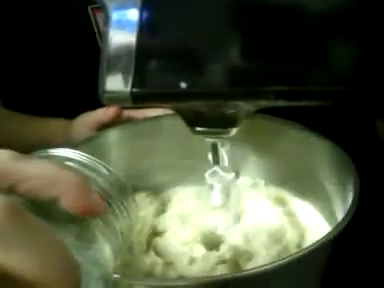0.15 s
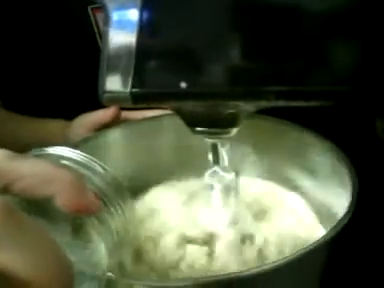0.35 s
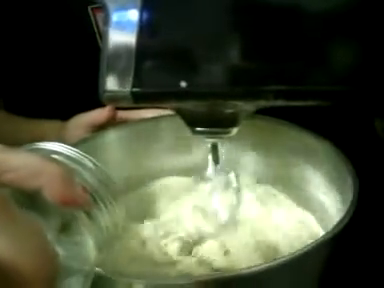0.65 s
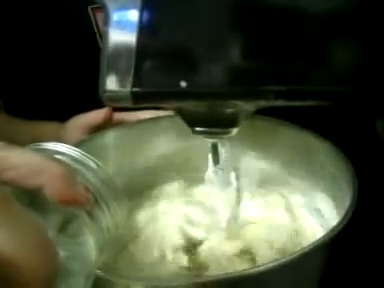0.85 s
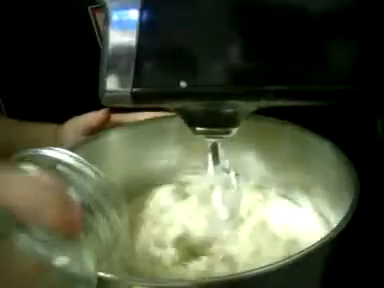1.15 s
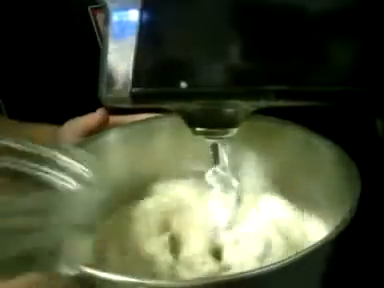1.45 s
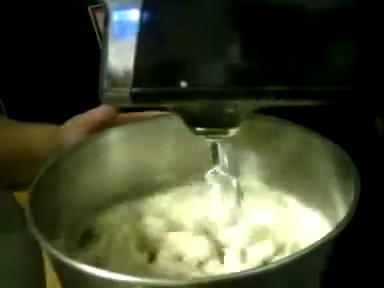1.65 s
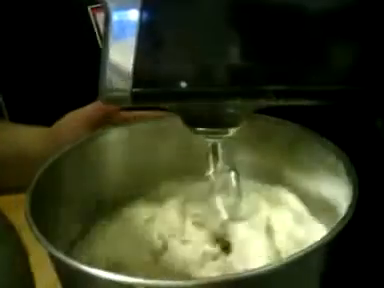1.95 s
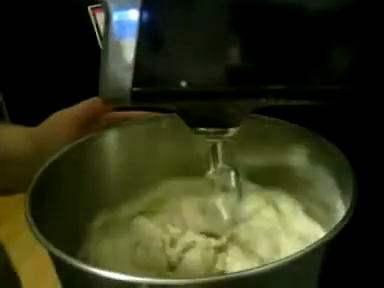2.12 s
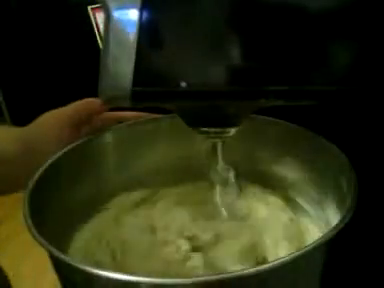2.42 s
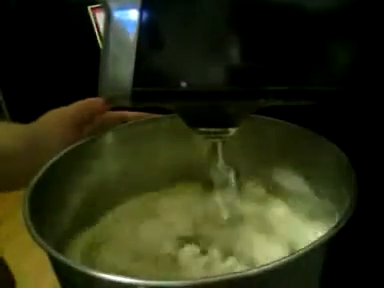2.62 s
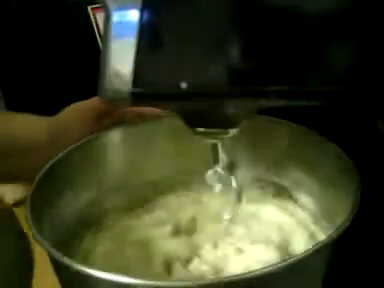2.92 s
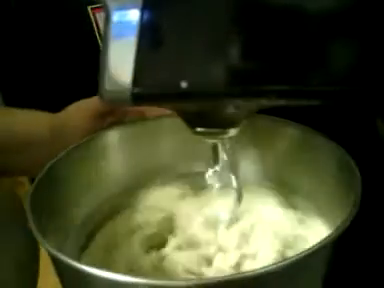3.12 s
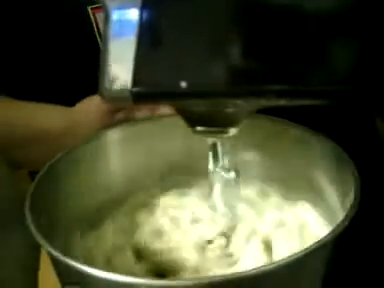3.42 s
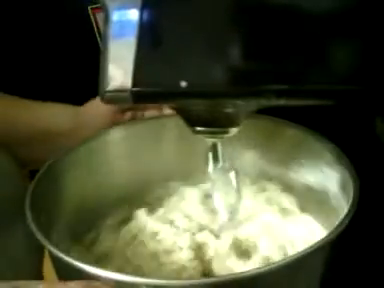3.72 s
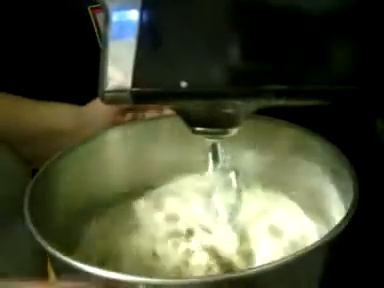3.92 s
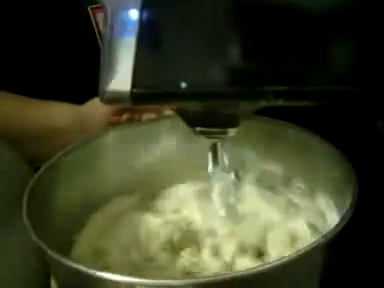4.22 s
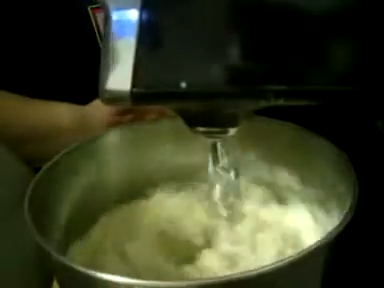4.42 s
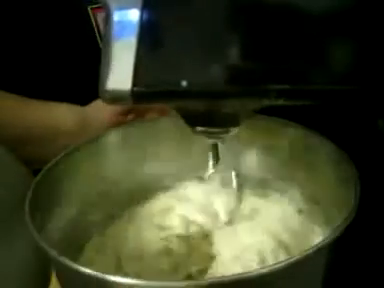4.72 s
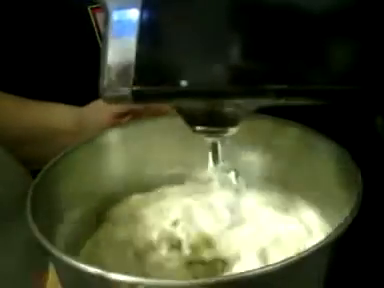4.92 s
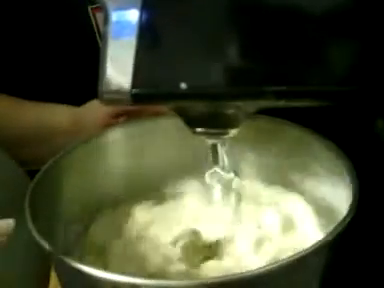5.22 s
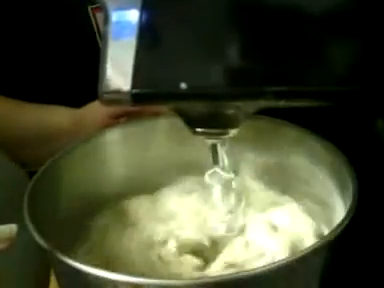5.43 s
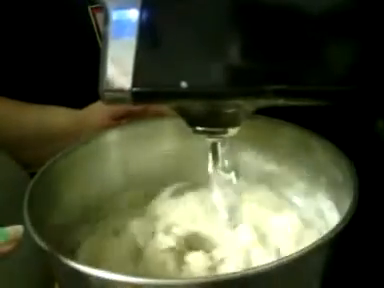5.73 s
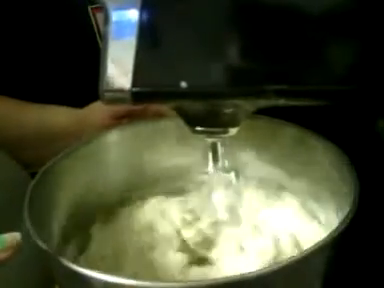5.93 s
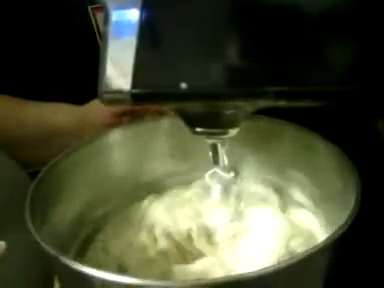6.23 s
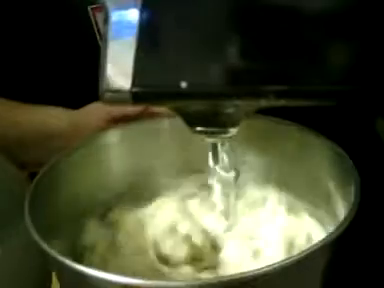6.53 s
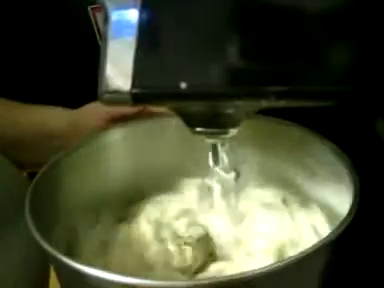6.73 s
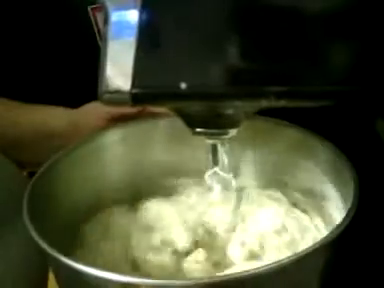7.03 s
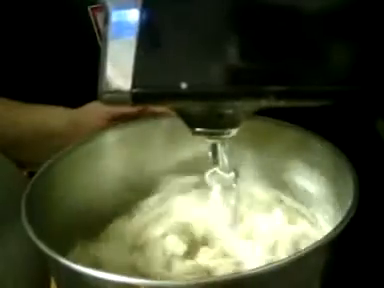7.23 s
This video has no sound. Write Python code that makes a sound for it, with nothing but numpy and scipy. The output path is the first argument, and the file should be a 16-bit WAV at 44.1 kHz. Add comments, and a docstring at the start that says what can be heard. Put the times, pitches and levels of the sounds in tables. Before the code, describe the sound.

A loud, gritty electric mixer runs throughout, buzzing with mains hum and a wavering high whine, slowing and recovering under the dough. Glass taps and shivers against the metal bowl at the start, thickest just before it lifts away. A short double clatter of woody thumps follows, then only motor, grinding and gear knocks remain. Close, cheap microphone with dull top end and crunchy clipped peaks.

```python
"""In a kitchen, a stand mixer kneads dough in a steel bowl. Sines follow the motor's angle and the mains, sagging
each time the hook digs in; shaped noise makes the gears grind, and damped modes make them knock.
A glass jar taps and shivers on the bowl's rim, as decaying rings and a wavering sine, then is set down on the
counter with woody thumps and clacks. A narrow-band microphone close by is driven into clipping."""
import sys
import numpy as np
from scipy import signal
from scipy.fft import rfft, irfft, next_fast_len
from scipy.io import wavfile
from scipy.ndimage import uniform_filter1d, minimum_filter1d, map_coordinates

SR = 44100
rng = np.random.default_rng(int(sys.argv[2]) if len(sys.argv) > 2 else 0)


def materialize(psi):
    """Save the field psi as 16-bit PCM at rate SR to the path in sys.argv[1].

    A 1-D psi becomes a single channel; in a 2-D psi each row is a channel.
    """
    bounded = np.clip(np.atleast_2d(psi).T, -1, 1)
    quanta = np.round(bounded * 32767).astype(np.int16)
    wavfile.write(sys.argv[1], SR, quanta)


N = 324576

# Motor speed, sagging under the dough. Each row: time in seconds, shaft turns in Hz.
SHAFT = [(0.0, 173.1), (0.2, 169.6), (0.35, 169.2), (0.56, 163.5), (0.88, 172.3), (1.2, 173.9),
         (1.45, 174.1), (1.87, 166.2), (2.08, 160.2), (2.33, 169.6), (2.72, 175.5), (3.19, 165.3),
         (3.65, 151.5), (3.96, 162.7), (4.4, 174.5), (4.84, 162.4), (5.08, 152.8), (5.28, 152.4),
         (5.45, 161.3), (5.86, 171.2), (6.07, 165.6), (6.29, 165), (6.52, 156.8), (6.73, 154.7),
         (7.1, 168.9), (7.36, 175.5)]
# Colours of the low, middle and high gear noise. Each row: frequency in Hz, relative density in dB per Hz.
RUMBLE = [(15, -61), (25, -46.5), (49, -20.5), (136, -15.5), (167, -15.5), (208, -14), (227, -15.5),
          (312, -0.5), (382, -11.5), (399, -8), (429, -7), (503, -2), (557, -11), (634, -5.5), (800, -16),
          (1040, -47.5), (1760, -120)]
GRIND = [(700, -62.5), (800, -8.5), (1100, -7.5), (1200, -9.5), (1450, -6), (1520, 4.5), (1630, -3.5),
         (1740, -3.5), (2100, -6), (2500, -6), (2900, -12.5), (3200, -61.5)]
HISS = [(1650, -30.5), (2800, -0.5), (3360, 1), (3870, -16), (4180, -19), (4560, -19.5), (5930, -52.5),
        (10000, -120)]

MAINS_PULSE_HZ = 120
GEAR_RATIO = 16.5  # motor turns per hook turn
MEAN_HZ = 165  # usual motor speed


def amp(db):
    """Decibels to linear gain."""
    return 10 ** (np.asarray(db) / 20)


def unit(x):
    """Scale to an rms of 1."""
    return x / np.sqrt(np.mean(x ** 2) + 1e-20)


def curves(rows):
    """One value per sample for each column after the time."""
    s, *cols = np.transpose(rows)
    return [np.interp(np.arange(N) / SR, s, c) for c in cols]


def wobble(rate):
    """A smooth random curve with rate knots a second, 60 at most."""
    step = np.arange(0, N + 32, 32)
    knots = rng.standard_normal(int(N / SR * 60) + 4)
    return np.interp(np.arange(N), step, map_coordinates(knots, [step * min(rate, 60) / SR]))


def filtered(x, response):
    """Multiply the spectrum of x by a response of frequency."""
    m = next_fast_len(N + SR // 2)
    return irfft(rfft(x, m) * response(np.fft.rfftfreq(m, 1 / SR)), m)[:N]


def noise(spectrum, patchy_db=0):
    """Noise of rms 1 with (Hz, dB) points on a log axis and short random patches of gain."""
    z = signal.stft(rng.standard_normal(N + 512), nperseg=512)[2]
    field = uniform_filter1d(rng.standard_normal(z.shape), 4, axis=0)
    field = uniform_filter1d(field, 4, axis=1)
    white = signal.istft(z * amp(patchy_db * unit(field)), nperseg=512)[1][:N]
    f, db = np.transpose(spectrum)
    return unit(filtered(white, lambda hz: amp(np.interp(np.log(hz + 1), np.log(f + 1), db))))


def add(track, s, sound):
    """Lay a sound on the track at time s."""
    piece = track[round(s * SR):][:len(sound)]
    piece += sound[:len(piece)]


def ring(hz, t60, attack, t):
    """A damped sine with a soft start."""
    decay = np.exp(-np.log(1000) * t / t60)
    return decay * (1 - np.exp(-t / attack)) * np.sin(2 * np.pi * hz * t)


def hook_angle():
    """The dough hook turns with the motor through the gears."""
    return 2 * np.pi * np.cumsum(curves(SHAFT)[0]) / SR / GEAR_RATIO


def mains_angle():
    """Phase of the mains pulse, twice per mains cycle."""
    return 2 * np.pi * MAINS_PULSE_HZ * np.arange(N) / SR


def housing(x):
    """The shell passes everything and lifts its resonances."""
    # Each row: centre in Hz, width in Hz, lift in dB.
    shell = [(2312, 59, 8.5), (506.7, 13, 12), (1679, 13, 8.5), (308.4, 16, 7)]

    def response(f):
        total = 1
        for c, w, db in shell:
            total = total + (amp(db) - 1) * 1j * f * w / (c * c - f * f + 1j * f * w)
        return total

    return filtered(x, response)


def motor_tones():
    """Shaft and commutator tones: whole multiples of the shaft angle, shifted by multiples of the mains pulse."""
    # Each row: shaft order, multiple of the mains pulse.
    orders = [(0, 2), (0, 3), (1, 0), (1, 1), (1, 2), (2, 0), (3, 0), (10, 0), (12, 0), (12, 1), (12, 2),
              (12, 3), (12, 4)]
    # One base level in dB per tone, ahead of the housing.
    tone_db = [-35, -33, -41, -33, -33.5, -30, -36.5, -30.5, -28.5, -27.5, -27, -27.5, -31.5]
    # Rise and fall of the commutator whine. Each row: time in seconds, relative level in dB.
    whine = [(0.0, -13.5), (0.67, -21), (0.84, -13.5), (1.43, -25.5), (1.5, -16.5), (2.07, -21.5),
             (2.56, -14.5), (2.68, -19.5), (2.87, -14.5), (3.48, -24.5), (4.28, -15), (5.31, -25),
             (5.47, -16), (5.68, -20.5), (5.84, -13), (6.15, -21.5), (6.41, -19.5), (6.64, -26),
             (7.22, -13.5), (7.36, -17.5)]
    # the whine escapes best near this frequency, 3 dB weaker one width away
    vent_hz, vent_width_hz = 2300, 197
    shaft_hz, = curves(SHAFT)
    angle, mains = hook_angle() * GEAR_RATIO, mains_angle()
    whine_db, = curves(whine)
    whine_db = whine_db - whine_db.mean()
    tones = np.zeros(N)
    for (order, beat), db in zip(orders, tone_db):
        # brush contact is never exact, so phase and level wander
        drift = 0.62 * wobble(45) + 1.22 * wobble(11) + rng.uniform(0, 2 * np.pi)
        level_db = db + 2.26 * wobble(14) + 1.2 * wobble(4.023)
        if order == 12:  # commutator whine
            off_hz = order * shaft_hz + beat * MAINS_PULSE_HZ - vent_hz
            level_db = level_db + whine_db - 10 * np.log10(1 + (off_hz / vent_width_hz) ** 2)
        tones += np.sqrt(2) * amp(level_db) * np.sin(order * angle + beat * mains + drift)
    return housing(tones)


def gear_noise():
    """Grinding gears: three noise bands that follow motor speed, throb with the hook and pulse with the mains."""
    # Shared swell of the three bands. Each row: time in seconds, level change in dB.
    noise_level = [(0.0, 2.5), (0.45, 0.1), (0.8, 4), (1.4, 0.5), (1.8, -0.8), (2.6, 0.1), (3.5, -1.1),
                   (4.1, -0.3), (5.3, -0.35), (6.2, -1.4), (6.6, -0.3), (7.36, -0.9)]
    hook, mains = hook_angle(), mains_angle()
    fast_hz = curves(SHAFT)[0] - MEAN_HZ
    swell_db, = curves(noise_level)
    # base level in dB, then change in dB per Hz of extra motor speed
    rumble_db = -20 + 0.12 * fast_hz + swell_db
    grind_db = -19.5 + 0.05 * fast_hz + swell_db
    hiss_db = -27 - 0.04 * fast_hz + swell_db
    throb = 0.91 * np.cos(hook + 0.64) + 2.4 * np.cos(2 * hook + 1.97) + 1.36 * wobble(25)
    # torque arrives twice per mains cycle
    pulse = 1.6 * np.cos(mains + 0.78) + 0.92 * np.cos(2 * mains + 1.4)
    rumble = amp(rumble_db + 0.76 * throb + 1.3 * wobble(12) + 0.3 * pulse) * noise(RUMBLE, patchy_db=2.0)
    grind = amp(grind_db + 0.43 * throb + 1.0 * wobble(9) + 0.58 * pulse) * noise(GRIND, patchy_db=2.5)
    hiss = amp(hiss_db + 0.79 * throb + 0.37 * wobble(10) + 1.2 * pulse) * noise(HISS, patchy_db=2.5)
    return housing(grind) + rumble + hiss


def backlash():
    """Each knock of the gears rings the gearbox and lets out a puff of the three gear noises."""
    # The loudest knocks. Each row: start in seconds, relative middle level in dB, relative thud level in dB.
    knocks = [(1.633, -2.5, -17.5), (1.879, -11, -7), (1.989, -6.5, -14.5), (2.272, -20.5, -9),
              (2.358, -14.5, -7.5), (2.556, -7.5, -18.5), (3.105, -2, -14.5), (3.15, -1.5, -15),
              (3.303, -2, -5), (3.613, -7, -26.5), (3.829, -20, -5), (4.246, -5, -14.5), (4.456, -9, -7),
              (4.552, -13, -9), (5.052, -11, -23), (5.106, -5, -16.5), (5.21, -20, -9), (5.334, -3, -6.5),
              (5.874, -17, -7), (6.034, -5, -20), (6.139, -3, -16.5), (6.229, -6.5, -5), (6.341, -3, -14.5),
              (6.444, -7, -5), (6.535, -7, -4.5), (6.669, -26, -6), (6.769, -3.5, -21), (7.188, -20, -16.5)]
    # Bright, middle and low groups of modes. Each row: nominal frequency in Hz, nominal level in dB, t60 in seconds.
    gearbox = [
        [(3200, 0, 0.052), (3570, -6.5, 0.019), (4340, -16, 0.023)],
        [(1084, -8.5, 0.046), (1430, -13, 0.073), (1504, -3, 0.09), (1656, 3, 0.04)],
        [(282.5, -0.5, .12), (332.6, -2.5, 0.11), (501.5, -8.5, 0.11), (666, -4.5, 0.048)],
    ]
    bright_db = -9.5  # bright part against the strongest part of a loud knock
    chatter_db, chatter_spread_db = [-21, -14.5, -17.5], 3.5  # light knocks: bright, middle, thud
    puffs, rings, t = np.zeros((3, N)), np.zeros(N), np.arange(SR // 10) / SR
    # a light knock near every half turn of the hook
    halves = np.flatnonzero(np.diff(hook_angle() // np.pi)) / SR
    chance = rng.standard_normal((len(halves), 4))
    light_s = np.abs(halves + .008 * chance[:, 0])
    light = np.c_[light_s, chatter_db + chatter_spread_db * chance[:, 1:]]
    loud = [(s, max(parts_db) + bright_db, *parts_db) for s, *parts_db in knocks]
    for s, *parts_db in [*loud, *light]:
        for puff, db, modes, puff_t60 in zip(puffs, parts_db, gearbox, (.07, .1, .15)):
            add(puff, s, amp(db - 13.5 - 60 * t / puff_t60) * (1 - np.exp(-t / 0.0015)))
            for hz, level_db, t60 in modes:
                strength = amp(db - 8) * amp(level_db + rng.normal(0, 5.75))
                add(rings, s, strength * ring(hz * rng.normal(1, .01), t60, 0.0033, t))
    bright = puffs[0] * noise(HISS)
    middle = housing(puffs[1] * noise(GRIND))
    thud = puffs[2] * noise(RUMBLE)
    return bright + middle + thud + rings


def ticks(count):
    """Light taps at uneven moments, in the same columns as the louder ones."""
    from_s, to_s = .2, 1.1
    when, size, pitch = rng.uniform(size=count), *rng.standard_normal((2, count))
    s = from_s + (to_s - from_s) * (np.arange(count) + when) / count
    level_db, hz = -13 + 6 * size, 2680 * (1 + .025 * pitch)
    return np.c_[s, level_db, hz, np.full(count, -12.5)]


def chord(modes, t60, t):
    """Modes struck together, each a little off in level and pitch."""
    total = np.zeros(len(t))
    for hz, db in modes:
        total += amp(db + rng.normal(0, 4.4)) * ring(hz * rng.normal(1, .015), t60, 0.001, t)
    return total


def jar_rattle():
    """The shaking bowl taps the glass; the spot of contact picks the strongest ring."""
    # The louder taps. Each row: time in seconds, level in dB, main ring in Hz, bowl against glass in dB.
    taps = [(0.0293, 3, 2932, -10.5), (0.0366, 4, 2930, -7.5), (0.1131, -7, 2660, -4),
            (0.1352, -0.5, 2625, -18), (0.1454, -6, 2690, -14), (0.1611, -11, 2785, -7.5),
            (0.1944, -9, 2724, -10), (0.3026, -10.5, 2820, -15), (0.6305, -7, 2550, -12.5),
            (0.6524, -7, 2690, -12), (0.6803, -14.5, 2990, 6), (0.7013, -7.5, 2680, -11.5),
            (0.7268, -8.5, 2850, -1.5), (0.7719, 2.9, 2772, -19), (0.78, -6.5, 2770, -14.5),
            (0.8469, -4, 2713, -8.5), (0.9234, -4, 2680, -14.5), (0.9996, -6.5, 2600, -8),
            (1.0145, -5.5, 3144, -3.5), (1.0264, -11, 2710, -10), (1.113, 5, 3130, -11),
            (1.176, -0.2, 2870, -8.5), (1.1864, 0.4, 2740, -18.5), (1.197, 2.7, 2760, -13.5),
            (1.2064, -1.5, 2846, -11.5), (1.2193, -4.5, 2625, -19), (1.2817, 2, 2780, -13.5),
            (1.2981, 1.5, 2866, -5.5), (1.3103, -0.5, 2720, -8.5), (1.3194, -6.5, 2930, -7),
            (1.334, -3, 2700, -20), (1.3739, 2, 2920, -5), (1.3901, 1.5, 2727, -8.5),
            (1.4016, 1.5, 2830, -9), (1.4129, -4, 2770, -7), (1.4183, 0, 2837, -12),
            (1.4267, -1, 2790, -15.5), (1.4404, -1.5, 2910, -18.5), (1.4454, 1.5, 2890, -12.5),
            (1.4564, -18, 2726, -19)]
    # Jar modes. Each row: nominal frequency in Hz, nominal level in dB.
    glass_modes = [(2680, -8), (2870, -6.5), (3020, -16.5), (3170, -11), (3700, -25.5)]
    # Steel bowl damped by dough. Each row: nominal frequency in Hz, nominal level in dB.
    bowl_modes = [(650, -5.5), (800, -6.5), (1000, -3), (1150, -6), (1390, 0.5), (1480, -8)]
    out, t = np.zeros(N), np.arange(SR // 5) / SR
    for s, db, hz, bowl_db in [*taps, *ticks(count=20)]:
        t60 = 0.069 * rng.uniform(.8, 1.25)
        glass = ring(hz, t60, 0.0016, t) + chord(glass_modes, t60, t)
        grit = amp(-9 - 60 * t / 0.092) * rng.standard_normal(len(t))  # the rim scuffs as it touches
        bowl = chord(bowl_modes, .05, t) + grit
        add(out, s - .001, amp(db) * (glass + amp(bowl_db) * bowl))
    return out


def jar_shiver():
    """The jar shivers against the rim: a wavering sine that pulses twice a hook turn."""
    # Each row: time in seconds, pitch in Hz, level in dB before the pulsing.
    buzz = [(0.1, 2677, -36), (0.148, 2632, -7.5), (0.33, 2630, -18), (0.48, 2640, -22.5),
            (0.75, 2670, -22.5), (0.85, 2710, -11), (0.93, 2696, -15.5), (0.98, 2680, -22),
            (1.12, 2700, -14.5), (1.15, 2780, -25)]
    hz, db = curves(buzz)
    level_db = db + 2.9 * wobble(32) + 4 * np.cos(2 * hook_angle() + 1.5)
    shiver = amp(level_db) * np.sin(2 * np.pi * np.cumsum(hz) / SR + 1.5 * wobble(55))
    time = np.arange(N) / SR
    return shiver * (time > buzz[0][0]) * (time < buzz[-1][0])


def jar_setdown():
    """The jar meets the counter in several bumps: damped wood modes plus a short noisy clack."""
    # Each row: start in seconds, level in dB, clack over the thump in dB.
    bumps = [(2.675, 1.7, -10.5), (2.683, -1, -22), (2.691, -5.5, -14.5), (2.749, -14.5, -17),
             (2.81, -6, -11), (2.816, -10, -7), (2.825, -9, -6), (2.833, -6, -2.5), (2.844, -13.5, -5),
             (2.879, -18, -6)]
    # Wood modes. Each row: frequency in Hz, nominal level in dB, t60 in seconds.
    counter = [(330, -16.5, .12), (455.3, 5, 0.075), (540, 2.5, 0.082), (677, 1, 0.072), (742, -5.5, 0.042),
               (980, -14, 0.026)]
    out, t = np.zeros(N), np.arange(SR // 5) / SR
    clatter = noise([(500, -28.5), (800, -3), (1300, -3.5), (2000, -5.5), (3200, -15.0), (4500, -30.0)])
    for s, db, clack_db in bumps:
        wood = np.zeros(len(t))
        for hz, level_db, t60 in counter:
            wood += amp(level_db + rng.normal(0, 1.6)) * ring(hz, t60, 0.0013, t)
        clack = amp(clack_db - 60 * t / 0.11) * clatter[round(s * SR):][:len(t)]
        add(out, s, amp(db) * (wood + clack))
    return out


def scene():
    """Sum the mixer and the jar into one channel."""
    mixer = motor_tones() + gear_noise() + backlash()
    jar = jar_rattle() + jar_shiver() + jar_setdown()
    return (mixer + jar)[None]


def record(dry):
    """The microphone path ends near 5 kHz; gain control ducks loud moments, what still peaks clips into treble."""
    # Circuit hiss. Each row: frequency in Hz, relative density in dB per Hz.
    circuit = [(20, -12), (6500, -18.5), (8000, 0), (13000, -1), (16000, -11)]
    mic_hz, top_hz = 5014, 15900
    narrow = filtered(dry[0], lambda hz: 1 / (1 + (hz / mic_hz) ** 60))
    level = np.sqrt(np.abs(uniform_filter1d(narrow ** 2, SR // 60)))
    gain = np.minimum(1, (amp(-11.0) / (level + 1e-9)) ** 0.16)
    held = uniform_filter1d(minimum_filter1d(gain, SR // 40), SR // 50) * narrow
    # a fast stage softens peaks
    peak_gain = np.minimum(1, np.abs(0.95 / (held + 1e-9)) ** 0.46)
    peak_gain = minimum_filter1d(peak_gain, SR // 300)
    held = held * uniform_filter1d(peak_gain, SR // 400)
    clipped = np.clip(held, -.98, .98) + amp(-84.0) * noise(circuit)
    return filtered(clipped, lambda hz: hz < top_hz)[None]


dry = scene()
out = record(dry)
materialize(out)
```